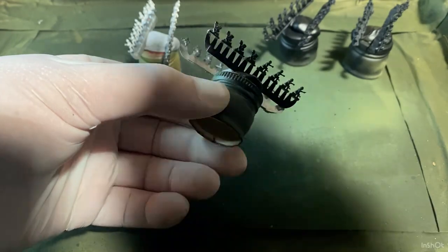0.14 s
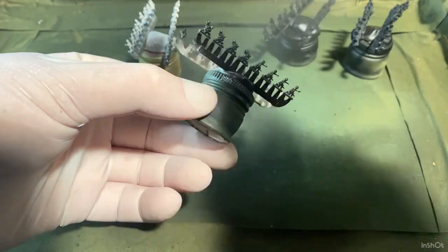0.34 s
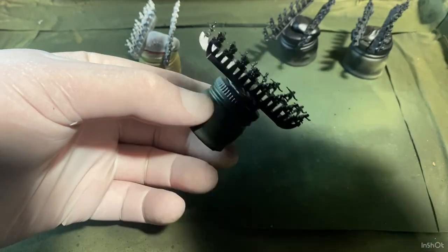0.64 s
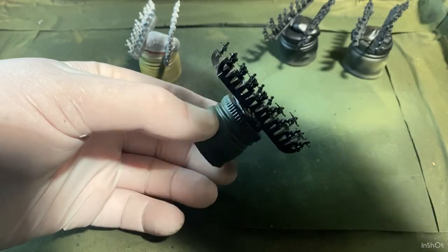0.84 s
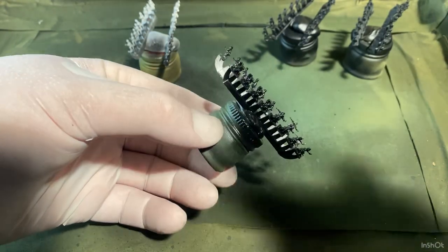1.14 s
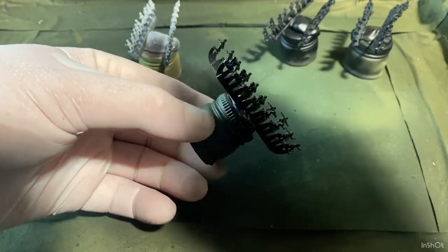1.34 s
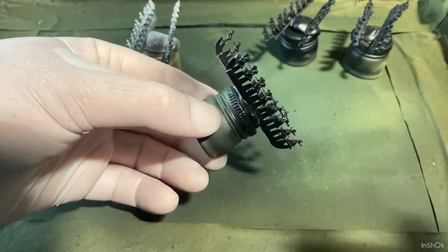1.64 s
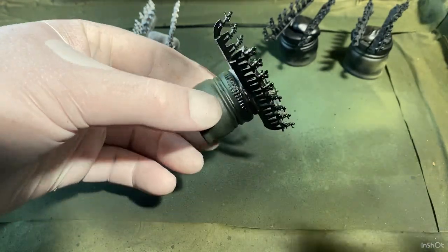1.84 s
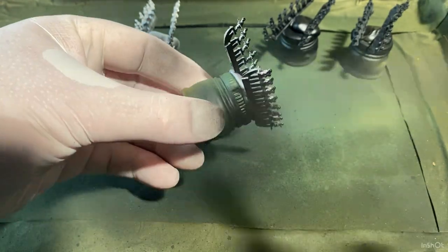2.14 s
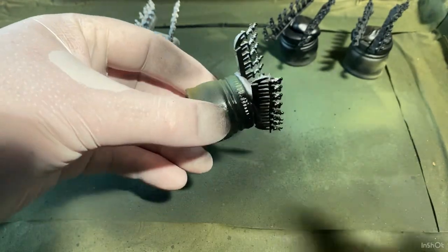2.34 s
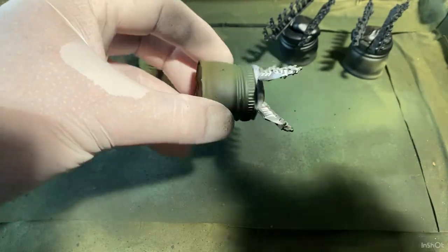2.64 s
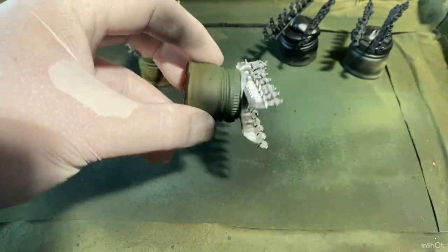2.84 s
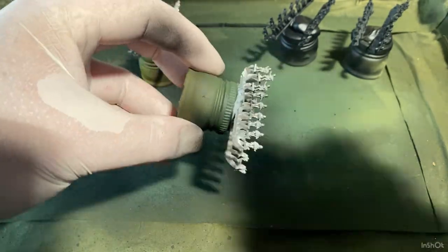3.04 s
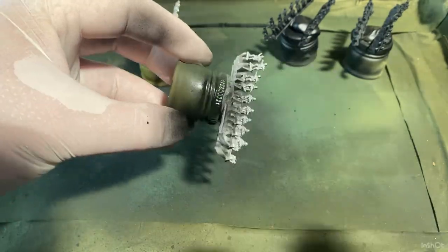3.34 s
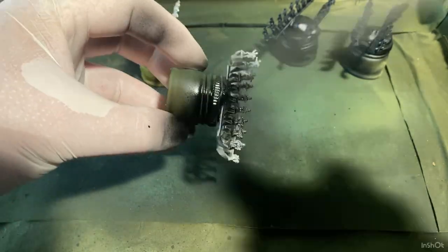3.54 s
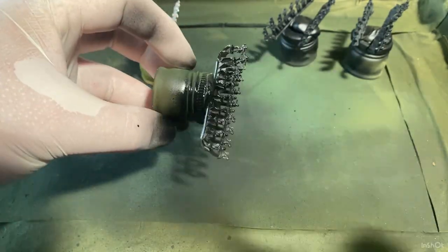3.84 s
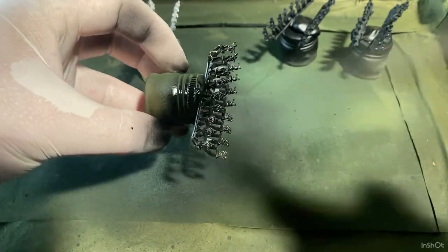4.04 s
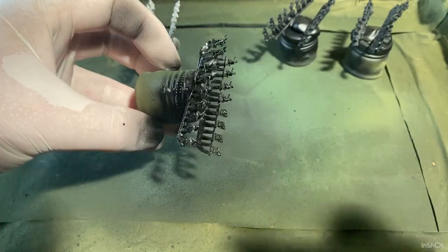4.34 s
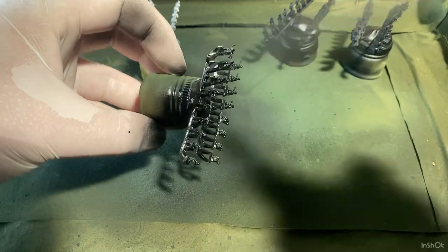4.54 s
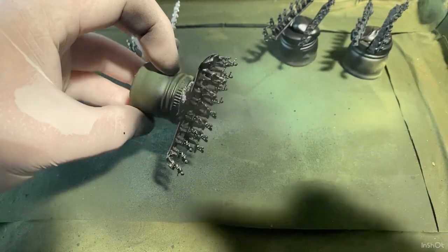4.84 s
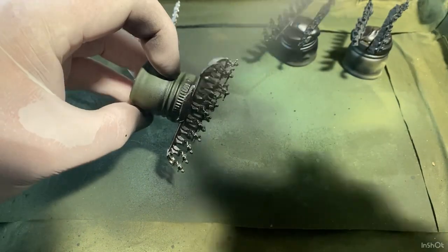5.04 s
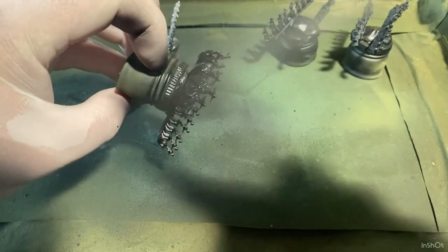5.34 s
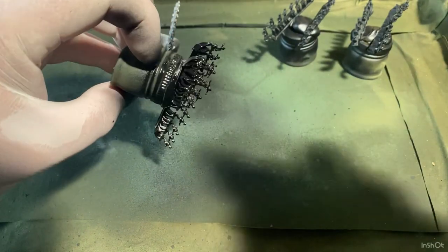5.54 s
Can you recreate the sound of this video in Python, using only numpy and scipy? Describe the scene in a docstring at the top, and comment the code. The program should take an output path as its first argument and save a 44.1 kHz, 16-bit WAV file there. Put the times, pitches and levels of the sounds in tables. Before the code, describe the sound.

Crisp aerosol bursts open quickly, sag slightly and shut off. At first the ball inside clacks against the can, hard and irregular, then trickles in small rattles between scattered puffs. In the second half regular puffs dominate, with low soft gusts of air on a close stereo microphone. The room is quiet with a short tail; a faint puff and a dull liquid flop finish.

```python
"""Short bright hisses and steel knocks: a spray paint can worked close to a two-port microphone in a quiet room.
Each press of the nozzle is band-shaped noise that leaks, opens, sags and shuts; its air stream rumbles on the ports.
The mixing ball strikes damped modes of the steel wall and base, with a noise crack for the contact.
Paint swishes, sloshes and flops inside as the can moves; short decaying noise tails form the room."""
import sys
import numpy as np
from scipy import signal
from scipy.fft import rfft, irfft, next_fast_len
from scipy.io import wavfile
from scipy.ndimage import uniform_filter1d, map_coordinates

SR = 44100
rng = np.random.default_rng(int(sys.argv[2]) if len(sys.argv) > 2 else 0)


def bounce(signal):
    """Save signal as a 16-bit WAV file at the path given by the first command-line argument."""
    frames = np.transpose(np.atleast_2d(signal))
    limited = np.clip(frames, -1, 1)
    pcm = np.round(limited * 32767).astype(np.int16)
    wavfile.write(sys.argv[1], SR, pcm)


N = 251537
TOP_HZ = 15700  # upper band limit

# Slow air and handling rumble. Each row: frequency in Hz, relative density in dB per Hz.
RUMBLE_SPECTRUM = [(15, -28.5), (35, -18), (58, 4), (100, -9), (170, -16), (400, -41.5), (1500, -70)]
# Paint flops against the end of the can. Each row: start in seconds, level in dB.
PAINT_FLOPS = [(5.562, -47)]


def amp(db):
    """Decibels to gain."""
    return 10 ** (np.asarray(db) / 20)


def unit(x):
    """Scaled to rms 1."""
    return x / np.sqrt(np.mean(x ** 2) + 1e-20)


def along(points, hz):
    """(Hz, value) points interpolated on a log frequency axis."""
    f, v = np.transpose(points)
    return np.interp(np.log(hz + 1), np.log(f + 1), v)


def wobble(knots_per_s):
    """Smooth random curve: a spline through normal random knots."""
    knots = rng.standard_normal(int(N * knots_per_s / SR) + 4)
    return map_coordinates(knots, [np.arange(N) * knots_per_s / SR])


def filtered(x, response):
    """x times a complex response of frequency."""
    m = next_fast_len(x.shape[-1] + 8192)
    spectrum = rfft(x, m) * response(np.fft.rfftfreq(m, 1 / SR))
    return irfft(spectrum, m)[..., :x.shape[-1]]


def noise(spectrum):
    """Two unrelated noises with the given colour, rms 1 overall."""
    white = rng.standard_normal((2, N))
    return unit(filtered(white, lambda hz: amp(along(spectrum, hz)) * (hz < TOP_HZ)))


def blend(pair, alike):
    """Two unrelated signals mixed into left and right with correlation alike."""
    turn = np.arccos(np.clip(alike, -1, 1)) / 2
    mid = np.cos(turn) * pair[0]
    side = np.sin(turn) * pair[1]
    return np.array([mid + side, mid - side])


def valve_flow(crack_s=0.0066, open_s=0.015, shut_s=0.019, creep_db=4, shut_db=16, dribble_s=.025, closed_db=46):
    """Jet strength: each press leaks, opens, sags as the pressure drops and shuts with a short dribble."""
    # Nozzle presses. Each row: first leak in seconds, leak length in s, hold length in s, strength in dB.
    presses = [(0.003, .037, 0.065, -18), (0.258, .025, 0.094, -18.5), (0.54, .042, .066, -19.5),
               (0.837, 0.041, 0.056, -25.5), (1.103, 0.028, 0.071, -35), (1.389, 0.026, 0.1, -18),
               (2.102, .027, 0.082, -17.5), (2.486, .012, .062, -39.5), (2.906, .035, 0.087, -33),
               (3.207, 0.04, 0.065, -19.5), (3.479, .028, 0.082, -17), (3.743, .032, 0.083, -19),
               (3.992, 0.04, 0.058, -20), (4.24, 0.042, 0.057, -19.5), (4.509, 0.035, 0.064, -20),
               (4.74, 0.035, 0.063, -18.5), (5.012, 0.035, 0.074, -17), (5.261, .032, 0.081, -18),
               (5.67, .016, .074, -35.5)]
    leak_at_0db_press_db, leak_db_per_press_db = -26, 0.63
    sag_db_per_s, full_press_db = 58.5, -16.5  # sag rate at a full press; lighter presses sag more slowly
    t = np.arange(N) / SR
    flow = np.zeros(N)
    for start, leak_s, hold_s, db in presses:
        opened = start + leak_s
        release = opened + hold_s
        shut = release + shut_s
        leak_db = leak_at_0db_press_db + leak_db_per_press_db * db
        end_db = db - sag_db_per_s * amp(db - full_press_db) * hold_s
        times = [start - crack_s, start, opened - open_s, opened, release, shut, shut + dribble_s]
        levels = [leak_db - 23.5, leak_db, leak_db + creep_db, db, end_db, end_db - shut_db, end_db - closed_db]
        # a leak shorter than open_s needs its times sorted
        flow += amp(np.interp(t, np.sort(times), levels, left=-200, right=-200))
    return flow


def spray(flow, sputter_db=.9, surge_db=.4):
    """The jet is hissing noise; drops of paint passing the nozzle make it sputter finely."""
    # Jet hiss. Each row: frequency in Hz, relative density in dB per Hz.
    hiss_spectrum = [(150, -11.4), (350, -14.2), (700, -16.2), (1500, -16.7), (2500, -13.1), (3600, -13.0),
                     (5200, -8.9), (6200, -9.0), (7300, -5.2), (8300, -6.9), (10000, -4.1), (12000, -5.7),
                     (14000, 0.0), (15300, -2.4)]
    sputter = unit(amp(sputter_db * wobble(900) + surge_db * wobble(90)))
    return flow * sputter * patchy(noise(hiss_spectrum), depth_db=2)


def patchy(x, depth_db):
    """The colour of x drifts in patches about 50 ms long and 500 Hz wide."""
    z = signal.stft(x, nperseg=512)[2]
    field = rng.standard_normal(z.shape[1:])
    field = uniform_filter1d(field, size=6, axis=0)  # frequency
    field = uniform_filter1d(field, size=9, axis=1)  # time
    return unit(signal.istft(z * amp(depth_db * unit(field)), nperseg=512)[1][:, :N])


def ball(knock_gain_db=16, spread_at_1khz_s=0.000788):
    """All contacts of the mixing ball; bending waves in the wall bring the low notes later."""
    # Ball hits wall. Each row: start in seconds, level in dB before knock_gain_db,
    # hardness of the contact in dB, ring of the base in dB.
    hits = [(0.027, -8.5, -5, -20.5), (0.029, -5, -8, -25.5), (0.144, -9.5, -12, -17),
            (0.242, -13.5, -12, -13.5), (0.315, -19, -11.5, -23), (0.358, -20, -8, -16),
            (0.567, -5.5, -7, -24), (0.692, -10.5, -19.5, -19.5), (0.845, -14.5, -17, -0.5),
            (1.176, -11, 4, -25.5), (1.178, -8, -3.5, -29.5), (1.267, -10.5, -18, -20.5),
            (1.366, -18, -16, -9), (1.687, -11.5, -3, -24), (1.804, -25.5, -0.5, -19),
            (1.818, -19, -4, -17), (1.825, -21.5, -1, -22.5), (1.86, -27, -4.5, -17),
            (1.905, -25, -19.5, -21), (1.94, -32, -11.5, -14.5), (2.838, -16, -22.5, -21),
            (2.877, -26.5, -7.5, -12), (2.896, -18.5, -13, -29), (2.92, -28, -12.5, -28),
            (2.946, -19.5, -6.5, -31), (3.006, -21.5, -9.5, -24), (3.194, -22, -5.5, -25.5),
            (3.74, -28, -10.5, -24), (4.719, -35.5, -11, -25), (5.246, -30.5, -3.5, -17.5)]
    out = np.zeros((2, N + SR))
    for s, db, hard_db, base_db in hits + bounces() + taps():
        blow = knock(hard_db, base_db)
        out[:, round(s * SR):][:, :blow.shape[1]] += amp(db + knock_gain_db) * blow
    # group delay falls as 1 / sqrt(frequency)
    return filtered(out[:, :N], lambda hz: np.exp(-4j * np.pi * spread_at_1khz_s * np.sqrt(1000 * hz)))


def knock(hard_db, base_db, high_gain_db=3, high_follows=0.31, crack_gain_db=-1,
          skid_db=-13, skid_follows=0.27, skid_t60_s=0.019):
    """One blow rings the steel; a harder contact cracks, skids more and lifts the upper modes."""
    # Steel-on-steel contact. Each row: frequency in Hz, relative density in dB per Hz.
    crack_spectrum = [(200, -22), (1000, -13), (4000, 4.5), (7000, -6.5), (10000, 5), (12500, 0),
                      (15000, -0.5)]
    # Modes of the paint-damped steel: lower wall, upper wall, domed base.
    # Each row: frequency in Hz, width in Hz, relative level in dB.
    low_wall = [(1800, 260, -8), (2080, 260, -1), (2400, 230, 0), (2700, 260, -2), (3150, 300, -7)]
    high_wall = [(4350, 500, -6), (4750, 450, 0), (5100, 450, -1), (6800, 900, -7)]
    base = [(750, 110, -8.5), (1040, 310, -0.5), (1360, 93, 4)]
    crack_t60_s = .014
    t = np.arange(SR // 20) / SR
    skid_envelope = amp(skid_db + skid_follows * hard_db - 60 * t / skid_t60_s)
    force = skid_envelope * rng.standard_normal((2, len(t)))
    force[0, 0] += 1  # the impact itself
    crackle = amp(-60 * t / crack_t60_s) * rng.standard_normal((2, len(t)))
    crack = filtered(crackle, lambda hz: amp(along(crack_spectrum, hz)))
    upper_db = high_gain_db + high_follows * hard_db
    steel = ring(low_wall, force) + amp(upper_db) * ring(high_wall, force) + amp(base_db) * ring(base, force)
    return (steel + amp(hard_db + crack_gain_db) * unit(crack)) / np.linalg.norm(steel)


def ring(modes, force, scatter_db=2.5, detune=.02):
    """Damped modes driven by a force; strength and pitch change with the spot that is hit."""
    t = np.arange(force.shape[1]) / SR
    response = np.zeros(len(t))
    for hz, width_hz, db in modes:
        pitch_hz = hz * (1 + detune * rng.standard_normal())
        level_db = db + scatter_db * rng.standard_normal()
        decay = np.exp(-np.pi * width_hz * t)
        response += amp(level_db) * width_hz * decay * np.cos(2 * np.pi * pitch_hz * t)
    return unit(signal.fftconvolve(force, response[None], axes=1)[:, :len(t)])


def bounces(count=4):
    """Contacts of the settling ball, cushioned by paint: each comes sooner and weaker than the last."""
    # Ball settling. Each row: start in seconds, level in dB before the knock gain, first flight in s.
    settles = [(0.919, -20.5, .037), (1.971, -20.5, .031)]
    flight_ratio, bounce_loss_db = .69, 4.5
    hard_db, base_db = -20.5, -14.5
    contacts = []
    for s, db, flight_s in settles:
        for k in range(count):
            elapsed_s = flight_s * sum(flight_ratio ** j for j in range(k))
            contacts.append((s + elapsed_s, db - bounce_loss_db * k, hard_db, base_db))
    return contacts


def taps(count=10):
    """The loose ball touches the wall lightly at random moments."""
    level_db, hard_db, base_db = -54, -28, -14.5  # level before the knock gain
    return [(s, level_db, hard_db, base_db) for s in rng.random(count) * N / SR]


def draught(flow, draught_db=-29.5, lag_s=0.004, gust_db=2, linger_db=-17, linger_s=.05):
    """Air dragged along by the jet reaches the ports later as a soft rumble; the slowest eddies linger."""
    # Air on the ports. Each row: frequency in Hz, relative density in dB per Hz.
    eddy_spectrum = [(15, -19.5), (35, -11), (60, 9.5), (110, -3.5), (220, -10), (450, -21.5), (1500, -52),
                     (5000, -100)]
    # How squarely the draught meets the ports. Each row: time in seconds, gain in dB.
    aim = [(0, 2), (.6, -2), (1.45, 3.5), (2.15, 6.5), (3.3, 2), (3.7, 1), (4.1, -4), (4.7, -6), (5.3, -3)]
    t = np.arange(N) / SR
    air = uniform_filter1d(np.interp(t - lag_s, t, flow), size=1200)
    wake = uniform_filter1d(np.interp(t - linger_s, t, flow), size=3000)
    aim_db = np.interp(t, *np.transpose(aim))
    eddies = blend(noise(eddy_spectrum), .85) * amp([[-1.2], [1.2]])
    slow_eddies = blend(noise(RUMBLE_SPECTRUM), .92)
    gusts = amp(draught_db + gust_db * wobble(25))
    return gusts * (amp(aim_db) * air * eddies + amp(linger_db) * wake * slow_eddies)


def handling(rumble_db=-62, rumble_follows=.25, hollow_db=5, swish_db=-1, lump_db=3, surge_db=2,
             flop_db=-22, flop_t60_s=1.4):
    """Can motion drives cavity slosh, paint swish and a low rumble; paint sloshes on after a flop."""
    # Briskness of the hand. Each row: time in seconds, drive level in dB.
    motion = [(0.0, -64.5), (0.22, -67.5), (0.36, -74.5), (0.62, -77), (0.81, -68.5), (1.36, -66.5),
              (1.51, -74), (1.7, -68.5), (2.02, -66.5), (2.63, -82), (2.87, -86.5), (2.98, -75.5),
              (3.46, -69.5), (3.73, -70.5), (3.86, -72.5), (4.78, -77.5), (5.44, -83.5), (5.7, -76)]
    # Soft swishes of noise, from brief faint ticks to longer washes.
    # Each row: middle in seconds, half length in s, level in dB.
    washes = [(0.02, .08, -55), (0.47, 0.084, -59), (1.006, 0.056, -55.5), (1.56, .07, -61),
              (2.059, .06, -48.5), (2.618, 0.014, -60), (3.0, .035, -45), (3.135, .01, -60),
              (3.409, 0.011, -61), (3.62, .06, -58), (4.445, 0.0072, -64)]
    # Paint swish, then slosh in the can's cavity. Each row: frequency in Hz, relative density in dB per Hz.
    swish_spectrum = [(500, -14.5), (1000, -6.5), (1700, -3.5), (2350, 7), (3200, -10.5), (4200, -8.5),
                      (5000, -11.5), (7500, -11.5), (15000, -15)]
    hollow_spectrum = [(60, -14), (200, -3.5), (300, 0.5), (390, 2.5), (480, -10), (650, -11),
                       (1200, -17.5), (4000, -16.5), (15000, -36)]
    t = np.arange(N) / SR
    motion_db = np.interp(t, *np.transpose(motion))
    wash = sum(amp(db) * np.exp(-((t - s) / half_s) ** 2) for s, half_s, db in washes)
    after_flop = sum((t > s) * amp(db + flop_db - 60 * np.abs(t - s) / flop_t60_s) for s, db in PAINT_FLOPS)
    stirred = amp(motion_db) + after_flop
    swish = (stirred * amp(swish_db + surge_db * wobble(13)) + wash) * amp(lump_db * wobble(54))
    paint = at_ports(swish * noise(swish_spectrum))
    slosh = stirred * amp(hollow_db) * blend(noise(hollow_spectrum), 0.2) * amp([[-1.5], [1.5]])
    rumble_level_db = rumble_db + rumble_follows * (motion_db - motion_db.mean())
    rumble = amp(rumble_level_db) * blend(noise(RUMBLE_SPECTRUM), 0.92)
    return paint + slosh + rumble


def bumps(cavity_hz=380, t60_s=0.024, rise_s=0.0034, splash_db=-14):
    """A soft flop of paint rings the can's cavity: a decaying sine with a little splash noise."""
    out = np.zeros((2, N + SR))
    t = np.arange(SR // 8) / SR
    for s, db in PAINT_FLOPS:
        cavity = 2 * np.sin(2 * np.pi * cavity_hz * t) * (1 - np.exp(-t / rise_s))
        splash = amp(splash_db) * rng.standard_normal((2, len(t)))
        out[:, round(s * SR):][:, :len(t)] += amp(db - 60 * t / t60_s) * (cavity + splash)
    return out[:, :N]


def at_ports(pair, direct=1):
    """The ports differ in level and phase; sound from all sides (direct under 1) is more evenly shared."""
    # The can at the two ports. Each row: frequency in Hz, left-right level in dB,
    # left lead in radians, likeness from 0 to 1.
    ports = [(90, -2.7, -0.92, 0.77), (400, -4.8, -1.41, 0.65), (900, -10.8, 2.3, 0.45),
             (1800, -8.6, 0.91, 0.49), (2600, -2.4, 0.13, 0.69), (4000, -9.3, -0.94, 0.46),
             (5000, -7.5, -0.44, 0.56), (6200, -4.3, -0.29, 0.63), (7300, 0.8, 1.43, 0.77),
             (9000, 0.0, 3.07, 0.97), (10500, -0.2, 4.59, 0.77), (12300, 0.0, 6.28, 0.96),
             (13800, -0.0, 7.87, 0.89), (15000, -0.0, 9.18, 0.95)]
    m = next_fast_len(N + SR // 4)
    hz = np.fft.rfftfreq(m, 1 / SR)
    f, balance, phase, likeness = np.transpose(ports)
    balance_db, lead, alike = [np.interp(hz, f, c) for c in (balance, np.unwrap(phase), likeness)]
    gains = amp(direct * np.array([balance_db, -balance_db]) / 2)
    gains = gains / np.sqrt(np.mean(gains ** 2, axis=0))
    turn = np.array([np.exp(1j * lead), np.ones(len(hz))])
    return irfft(blend(rfft(pair, m), alike ** (2 - direct)) * gains * turn, m)[:, :N]


def room(x, size=6000):
    """Each block of size samples is convolved with a freshly drawn noise tail, so the tails do not repeat."""
    out = np.zeros((2, N + SR))
    for start in range(0, N, size):
        echo = signal.fftconvolve(x[:, start:start + size], room_tail(), axes=1)
        out[:, start:start + echo.shape[1]] += echo
    return out[:, :N]


def room_tail(early_db=5, early_t60_s=0.087, gap_s=0.00059):
    """Quick echoes off the work table, then a short tail that dies soonest in the treble."""
    # Late decay. Each row: frequency in Hz, t60 in s.
    late_t60 = [(200, 0.22), (2300, 0.24), (6000, 0.23), (14000, 0.11)]
    hz, t, z = signal.stft(rng.standard_normal((2, SR // 3)), SR, nperseg=256)
    late = amp(-60 * t / along(late_t60, hz)[:, None])
    early = amp(early_db - 60 * t / early_t60_s)
    tail = signal.istft(z * (late + early), SR, nperseg=256)[1]
    # silent for gap_s, then fades in over another gap_s
    tail = tail * np.clip(np.arange(tail.shape[1]) / SR / gap_s - 1, 0, 1)
    return tail / np.linalg.norm(tail[0])


def scene(spray_wet_db=-17, ball_wet_db=-9):
    """The jet is heard mostly directly; the ball's knocks feed the room more strongly."""
    flow = valve_flow()
    jet = spray(flow)
    knocks = ball()
    echoes = room(amp(spray_wet_db) * jet + amp(ball_wet_db) * knocks)
    return at_ports(jet + knocks) + at_ports(echoes, direct=0.56) + draught(flow) + handling() + bumps()


def record(dry):
    """Very steep low-pass at TOP_HZ."""
    return filtered(dry, lambda hz: 1 / np.sqrt(1 + (hz / TOP_HZ) ** 360))


dry = scene()
out = record(dry)
bounce(out)
```